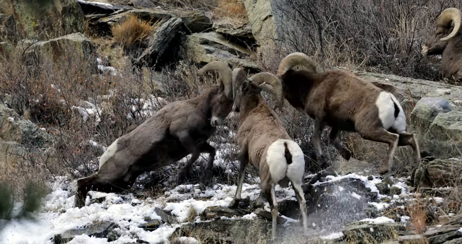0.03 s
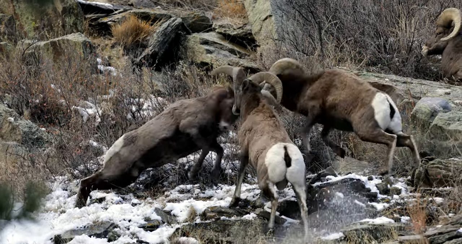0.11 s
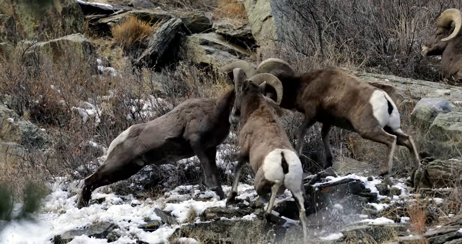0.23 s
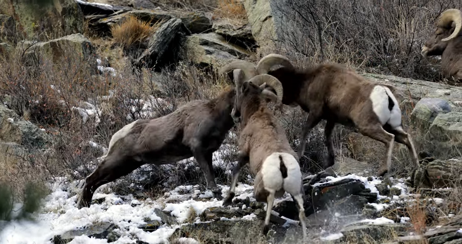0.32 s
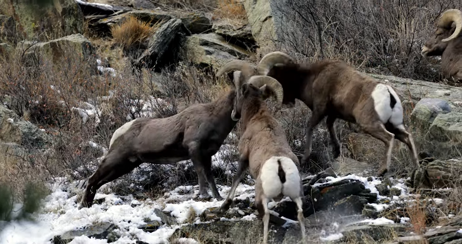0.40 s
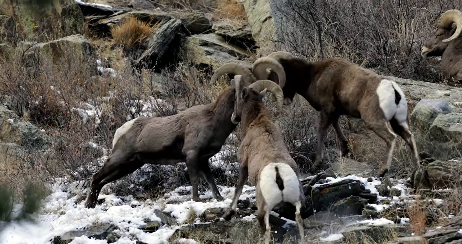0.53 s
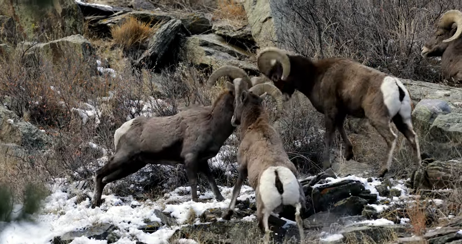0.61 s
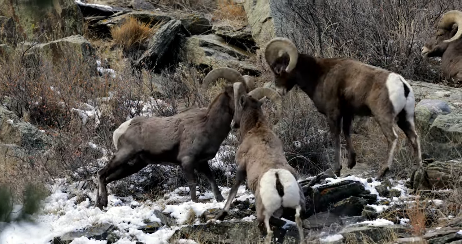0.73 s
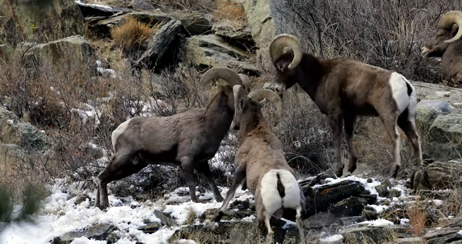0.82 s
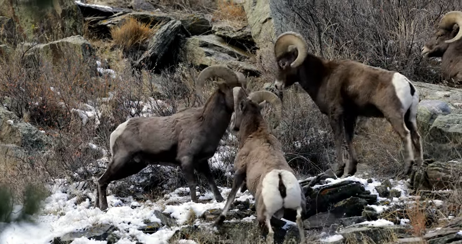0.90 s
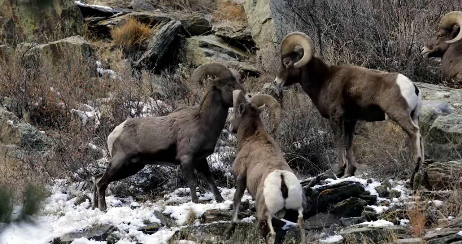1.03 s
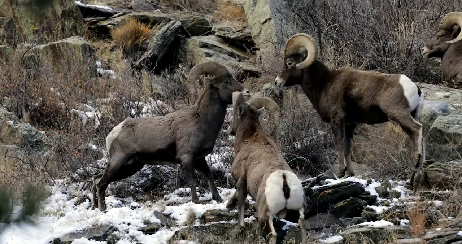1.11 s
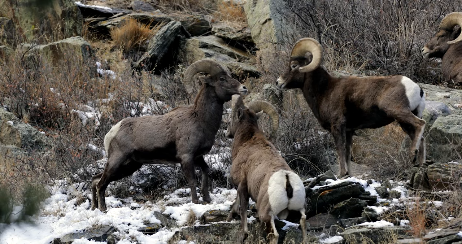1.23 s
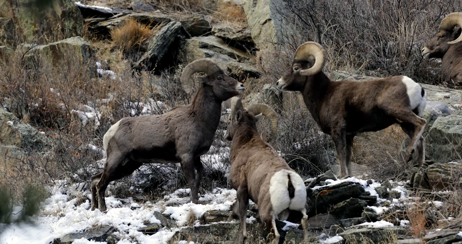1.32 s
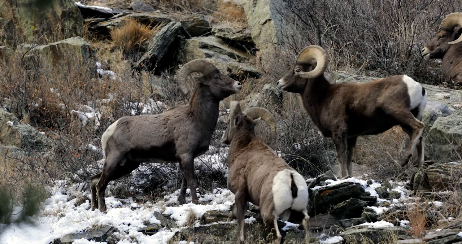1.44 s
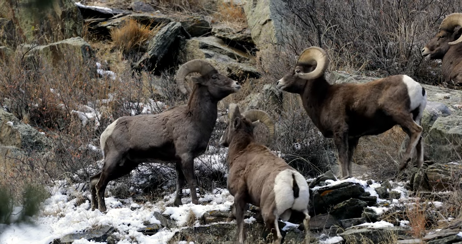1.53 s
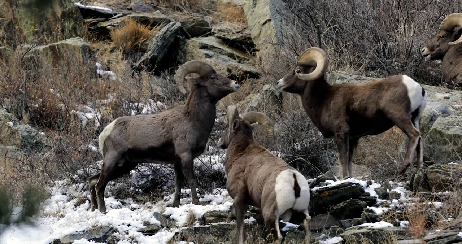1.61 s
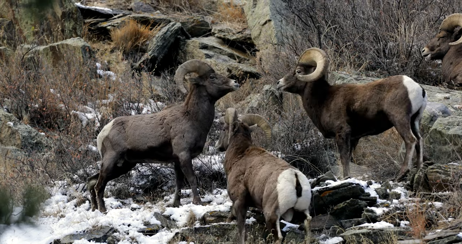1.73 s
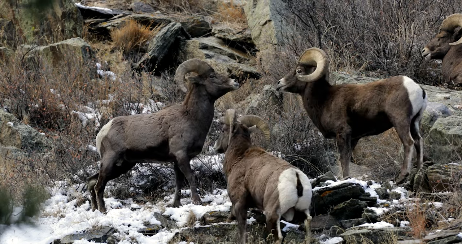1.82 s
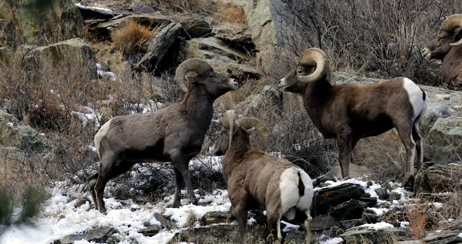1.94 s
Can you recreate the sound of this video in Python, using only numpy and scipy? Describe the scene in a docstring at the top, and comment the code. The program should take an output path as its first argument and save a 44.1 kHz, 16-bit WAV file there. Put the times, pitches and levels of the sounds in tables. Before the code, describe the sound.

One violent head-butt between rams, a horn crack on a deep thud, clips the microphone straight ahead, then gritty rock echoes die quickly, leaving a soft rushing stream with small bubbles and plops outdoors.

```python
"""Two rams butt heads straight ahead of the microphones, on a rocky slope beside a stream.
The blow is a deep thud of lengthening swings, with a horn crack of abrupt pushes and splinter noise on top.
The rocks throw the crack back as gritty decaying noise and single sharp flicks.
The stream, slightly spread in stereo, is patchy noise with short rising sines for bubbles and plops.
The blow overloads the microphone input, which clips flat; faint noise is heard at high levels."""
import sys
import numpy as np
from scipy import signal
from scipy.fft import rfft, irfft, next_fast_len
from scipy.io import wavfile
from scipy.ndimage import uniform_filter1d, map_coordinates

SR = 44100
rng = np.random.default_rng(int(sys.argv[2]) if len(sys.argv) > 2 else 0)


def int16_out(signal):
    """Quantize to a 16-bit WAV file."""
    q = np.round(np.clip(np.atleast_2d(signal).T, -1, 1) * 32767)
    wavfile.write(sys.argv[1], SR, q.astype(np.int16))


N = 85995
T = np.arange(N) / SR

# Course of the stream's level before its random swell: start_s, level_db [s, dB]
STREAM_LEVEL = [(0.0, -43.5), (0.178, -42), (0.358, -41.5), (0.884, -42.5), (1.95, -42)]
# Relative spectrum of the rushing water: frequency_hz, level_db [Hz, dB per Hz]
WATER_SPECTRUM = [(24, -27), (40, -21.5), (133, -31.5), (289, -13), (539, -8), (643, -2), (846, 0.5),
                  (1060, -5.5), (1540, -4.5), (1660, -7), (8240, -25.5), (11100, -30.5), (15800, -42.5)]
# Likeness of the rush in the left and right microphones: frequency_hz, likeness [Hz, correlation]
STEREO_LIKENESS = [(60, .99), (200, 0.88), (640, 0.97), (2400, 1), (4400, 1), (8000, 0.98), (15000, 0.72)]
# Stream balance, left over right: frequency_hz, level_db [Hz, dB]
STEREO_LEAN = [(60, -3), (110, 4), (200, -5.5), (380, -2), (700, -1.5), (1290, -0.5), (2380, 0), (4400, 0),
               (8120, -4), (15000, -0.5)]
# Larger plops and droplets: start_s, level_db, pitch_hz, cycles [s, peak dB, starting Hz, decay in cycles]
PLOPS = [(.472, -43.5, 10000, 6), (.485, -47, 5300, 14), (0.594, -43, 4340, 9), (1.1025, -30, 628, 7.1),
         (1.276, -43, 3870, 10), (1.306, -51, 10500, 5), (1.4002, -39, 3320, 6.6), (1.448, -40, 6500, 4),
         (1.47, -44, 10500, 5), (1.482, -37, 3630, 6.7), (1.523, -45, 11400, 7), (1.5576, -38, 6800, 5),
         (1.58, -45, 8500, 5), (1.676, -36, 610, 9), (1.75, -45, 7000, 4), (1.772, -51.5, 8000, 7),
         (1.7943, -39, 5860, 5.5), (1.932, -42, 7000, 5)]
# Horn contacts: start_s, length_s, rise_s, release_s, level_db, sign, splinter_db
# [s, s, s, s, push dB before it grows, +1 or -1, noise dB]
HORN_CONTACTS = [(.24728, .0055, .0004, .0025, -1.6, -1, -9), (.2483, .0007, .00004, .00006, -.3, 1, -30),
                 (.2656, .0007, .0002, .0004, -14, 1, -26), (.2671, .0005, .0002, .0003, -16, 1, -27),
                 (.2681, .0012, .0002, .0003, -13, 1, -23), (.2701, .0225, .00006, .014, -8.5, 1, -24)]
# Gritty echoes off the rocks: start_s, rise_s, level_db, t60_s [s, s, dB before rise and decay, s]
ROCK_ECHOES = [(.264, 0.0092, -22.5, 0.18), (.284, 0.03, -25.5, .4)]
# Relative spectrum of the rock echoes: frequency_hz, level_db [Hz, dB per Hz]
ROCK_SPECTRUM = [(120, -33), (200, -5), (700, 1), (1100, -11), (2500, -13), (4700, -21.5), (7000, -19),
                 (11000, -27), (15500, -32)]
# Sharp single echoes among them: peak_s, level_db [s, peak dB]
ROCK_FLICKS = [(.2858, -26), (.2873, -25), (0.2906, -18), (0.2947, -19), (0.2957, -25), (0.2982, -21),
               (0.301, -25), (0.309, -19.5)]

# Stream
PATCH_DB, SWELL_DB, SWELL_KNOTS_PER_S = 1.36, .4, 7.26
BUBBLES_PER_S, BUBBLE_HZ, BUBBLE_SPREAD, BUBBLE_CYCLES = 420, 2384, 1.046, 5.26  # spread in log pitch
BUBBLE_DB = -9  # all small bubbles against the rush
BUBBLE_BRIGHT = 0.57  # share of the water spectrum's dB that the bubbles follow
PITCH_RISE = 0.085  # fraction of the starting pitch gained over one bubble's given cycles

# Thud
CLASH_S = .23218
THUD_DB, THUD_DECAY_S = -2, 0.063
SNAP_DB, SNAP_DECAY_S = 17.5, .0067  # a strong extra start to the swings
FIRST_SWING_S, STRETCH = .00752, 2.17  # wait after the clash; each swing's length over the one before
SUCK_DB, SUCK_RISE_S, SUCK_END_S, SUCK_FALL_S = 9.6, .0031, .006, .0019  # dB scales the drop's two slopes

# Crack and echoes
PUSH_GROWS, SPLINTER_S = 1, 0.00025  # fraction a push gains over its length; width of a noise spit
ROCK_TREBLE_HZ, TREBLE_LOSS_DB_PER_S = 4000, 82
GRIT_KNOTS_PER_S, GRIT_DB = 600, 3
FLICK_S = 0.00021

# Microphone input
CLIP_AT, HARDNESS = .565, 30  # level limit; sharpness of the knee
NOISE_DB, NOISE_HZ = -39, 494  # noise level at the clipping limit; where its treble starts to fall
TOP_HZ, ROLL_OFF_HZ = 16100, 15000


def amp(db):
    """Decibels to a linear factor."""
    return 10 ** (np.asarray(db) / 20)


def unit(x):
    """Scale to an RMS of one."""
    return x / np.sqrt(np.mean(x ** 2) + 1e-20)


def along(points, hz):
    """Read a table of frequency_hz, value on a log frequency axis."""
    f, v = np.transpose(points)
    return np.interp(np.log(hz + 1), np.log(f + 1), v)


def wobble(rate):
    """A random curve with rate knots a second."""
    knots = rng.standard_normal(int(N * rate / SR) + 4)
    return map_coordinates(knots, [T * rate])


def filtered(x, response):
    """Multiply the spectrum of x by a response of frequency."""
    m = next_fast_len(N + SR // 2)
    return irfft(rfft(x, m) * response(np.fft.rfftfreq(m, 1 / SR)), m)[..., :N]


def blips(start_s, pitch_hz, cycles, level):
    """Bubbles ring as short sines of rising pitch, with a soft start and a decay set in cycles."""
    t = np.arange(1200) / SR
    age = t * (pitch_hz / cycles)[:, None]  # 1 after the given number of cycles at the starting pitch
    envelope = level[:, None] * np.e * 3 * age * np.exp(-3 * age)
    turns = np.reshape(cycles, (-1, 1)) * (age + PITCH_RISE * age * age / 2)
    rows = envelope * np.sin(2 * np.pi * turns)
    at = (start_s * SR).astype(int)[:, None] + np.arange(len(t))
    return np.bincount(at.ravel(), rows.ravel(), N + SR)[:N]


def patchy_rush():
    """Rushing water: stereo noise whose level varies in patches over time and frequency."""
    z = signal.stft(rng.standard_normal((2, N)), nperseg=512)[2]
    patches = uniform_filter1d(rng.standard_normal(z.shape[1:]), size=6, axis=0)  # across frequency
    patches = uniform_filter1d(patches, size=8, axis=1)  # across time
    pair = unit(signal.istft(z * amp(PATCH_DB * unit(patches)), nperseg=512)[1][:, :N])

    def mid_side_response(hz):
        # this angle splits mid and side so that left and right have the wanted likeness
        turn = np.arccos(np.clip(along(STEREO_LIKENESS, hz), -1, 1)) / 2
        return amp(along(WATER_SPECTRUM, hz)) * [np.cos(turn), np.sin(turn)]

    mid, side = filtered(pair, mid_side_response)
    return unit(np.array([mid + side, mid - side]))


def small_bubbles():
    """Many small bubbles ring at random times, pitches and levels, alike in both microphones."""
    when, size = rng.random((2000, 2)).T
    pitch_hz = np.clip(BUBBLE_HZ * np.exp(BUBBLE_SPREAD * rng.standard_normal(len(when))), 450, 14000)
    start_s = when * len(when) / BUBBLES_PER_S
    level_db = BUBBLE_BRIGHT * along(WATER_SPECTRUM, pitch_hz) - 3.0 * np.log(1 - size)
    level = (start_s < T[-1]) * amp(level_db)  # silence those that start past the end
    return unit(blips(np.minimum(start_s, T[-1]), pitch_hz, BUBBLE_CYCLES, level))


def stream():
    """A swelling rush with small bubbles in it, and a few larger plops on top."""
    water = patchy_rush() + amp(BUBBLE_DB) * small_bubbles()
    opposite = np.array([[1], [-1]])  # half the lean to each side
    water = unit(filtered(water, lambda hz: amp(along(STEREO_LEAN, hz) / 2 * opposite)))
    level_db = np.interp(T, *np.transpose(STREAM_LEVEL)) + SWELL_DB * wobble(SWELL_KNOTS_PER_S)
    start_s, plop_db, pitch_hz, cycles = np.transpose(PLOPS)
    return water * amp(level_db) + blips(start_s, pitch_hz, cycles, amp(plop_db))


def thud():
    """Pressure drops ahead of the blow, then swings back and forth ever longer and weaker."""
    u = T - CLASH_S
    # logarithmic time makes each swing STRETCH times as long as the last
    swings = np.log(np.maximum(u, 1e-4) / FIRST_SWING_S) / np.log(STRETCH)
    snap = amp(SNAP_DB) * np.exp(-np.abs(u) / SNAP_DECAY_S)
    strength = amp(THUD_DB) * np.exp(-np.abs(u) / THUD_DECAY_S) + snap
    body = strength * np.sin(np.pi * np.maximum(swings, 0))
    v = u - SUCK_END_S
    rising = np.exp(np.clip(-v / SUCK_RISE_S, -50, 50))
    falling = np.exp(np.clip(v / SUCK_FALL_S, -50, 50))
    return body - amp(SUCK_DB) / (rising + falling)


def crack():
    """Each horn contact is an abrupt push that grows and lets go, with a spit of splintery noise."""
    out = np.zeros(N)
    for start_s, length_s, rise_s, release_s, level_db, sign, splinter_db in HORN_CONTACTS:
        u = T - start_s
        gate = np.clip(u / rise_s, 0, 1) * np.clip((length_s - u) / release_s, 0, 1)
        out += sign * amp(level_db) * gate * (1 + PUSH_GROWS * u / length_s)
        out += amp(splinter_db) * np.exp(-(u / SPLINTER_S) ** 2) * rng.standard_normal(N)
    return out


def echoes():
    """Many small rock faces return the crack: gritty noise whose treble dies first."""
    grit = rng.standard_normal(N) * amp(GRIT_DB * wobble(GRIT_KNOTS_PER_S))
    rock = unit(filtered(grit, lambda hz: amp(along(ROCK_SPECTRUM, hz)) * (hz > 150)))
    low = filtered(rock, lambda hz: 1 / (1 + (hz / ROCK_TREBLE_HZ) ** 2))
    treble = rock - low
    out = np.zeros(N)
    for start_s, rise_s, level_db, t60_s in ROCK_ECHOES:
        u = np.maximum(T - start_s, 0)
        envelope = amp(level_db - 60 * u / t60_s) * np.minimum(u / rise_s, 1)
        out += envelope * (low + amp(-TREBLE_LOSS_DB_PER_S * u) * treble)
    return out


def flicks():
    """Single rock faces answer with short negative flicks that rise faster than they die."""
    out = np.zeros(N)
    for peak_s, level_db in ROCK_FLICKS:
        slope_s = np.where(T < peak_s, FLICK_S / 6, FLICK_S)
        out -= amp(level_db) * np.exp(-np.abs(T - peak_s) / slope_s)
    return out


def scene():
    """The clash is straight ahead, the stream slightly spread."""
    return stream() + thud() + crack() + echoes() + flicks()


def record(dry):
    """The microphone input clips flat; faint noise is added at high levels and the treble is limited."""
    flat = dry / (1 + np.abs(dry / CLIP_AT) ** HARDNESS) ** (1 / HARDNESS)
    noise = unit(filtered(rng.standard_normal(N), lambda hz: (hz > 150) / (1 + hz / NOISE_HZ)))
    noisy = flat + amp(NOISE_DB) * noise * (flat / CLIP_AT) ** 2
    return filtered(noisy, lambda hz: (hz < TOP_HZ) / (1 + (hz / ROLL_OFF_HZ) ** 8))


dry = scene()
out = record(dry)
int16_out(out)
```